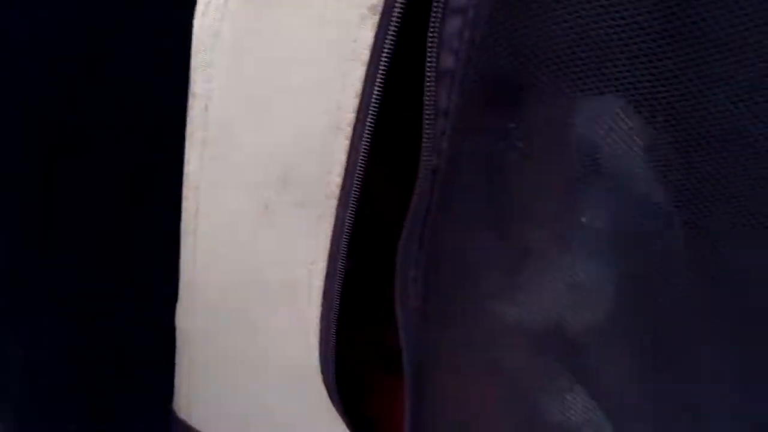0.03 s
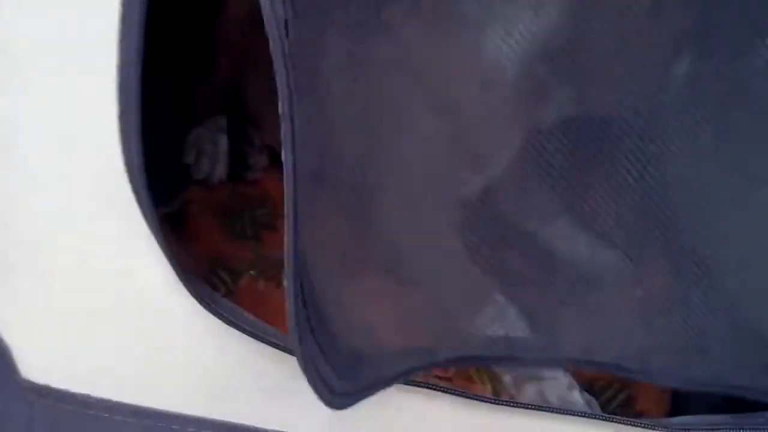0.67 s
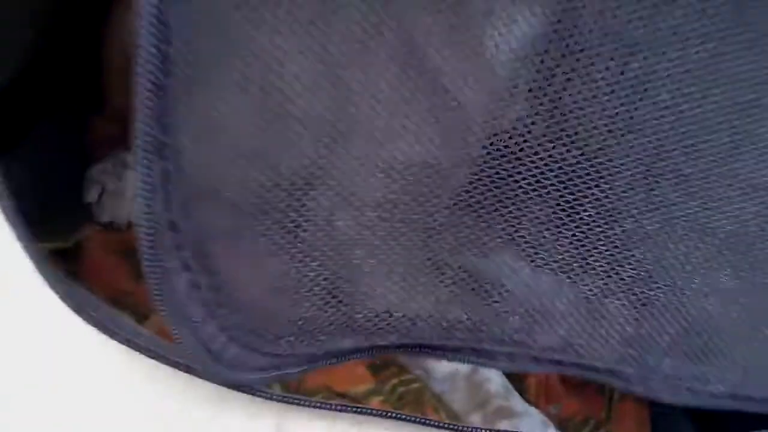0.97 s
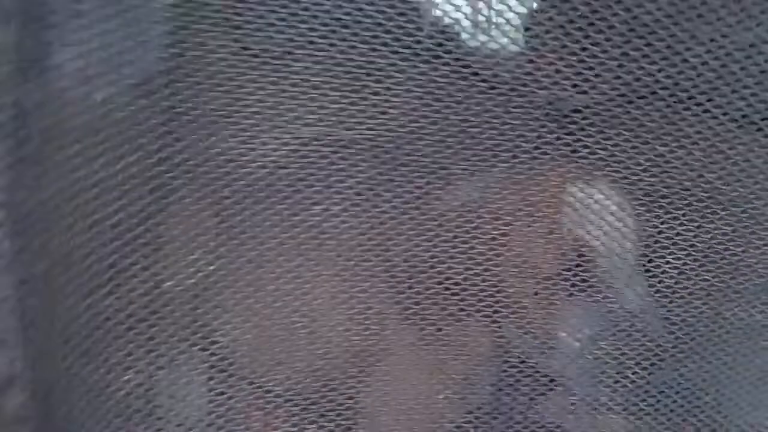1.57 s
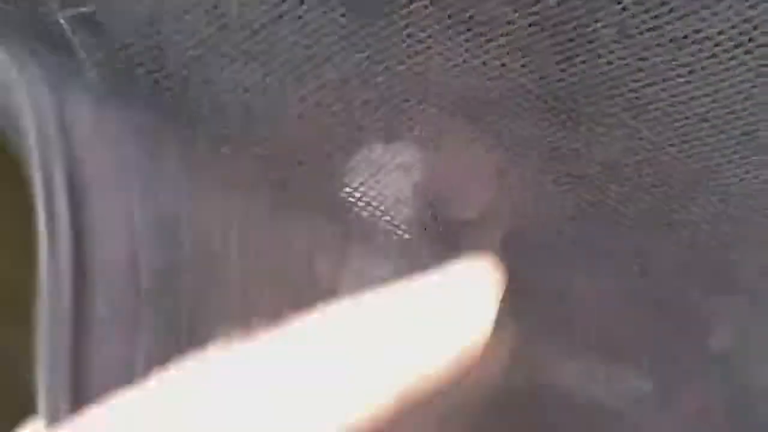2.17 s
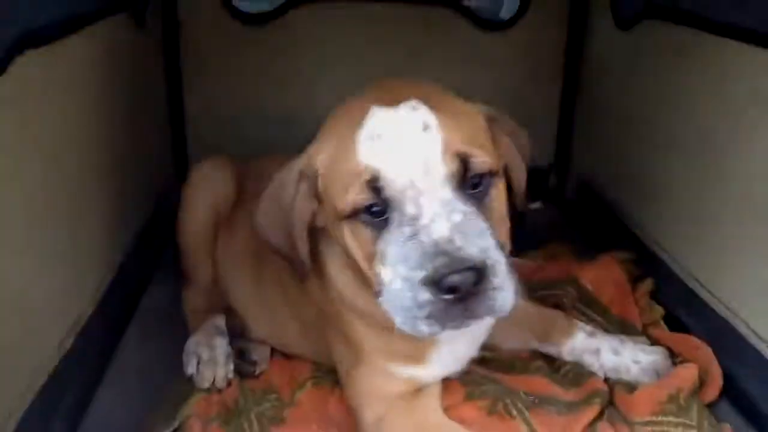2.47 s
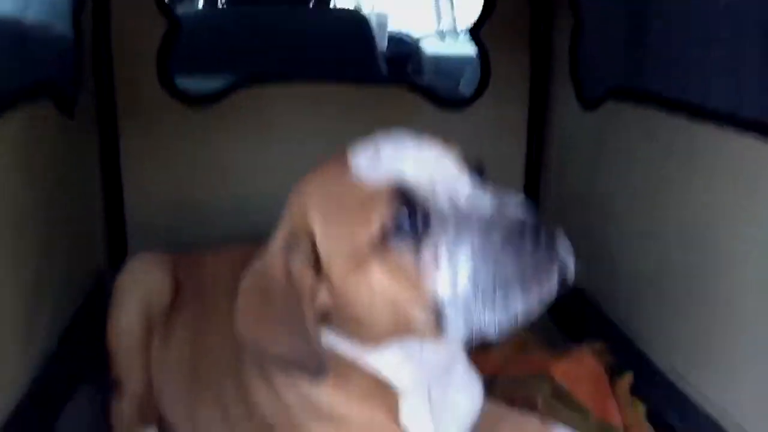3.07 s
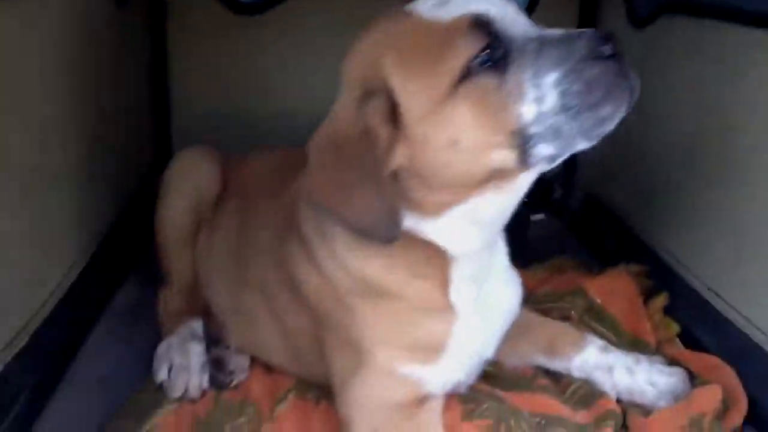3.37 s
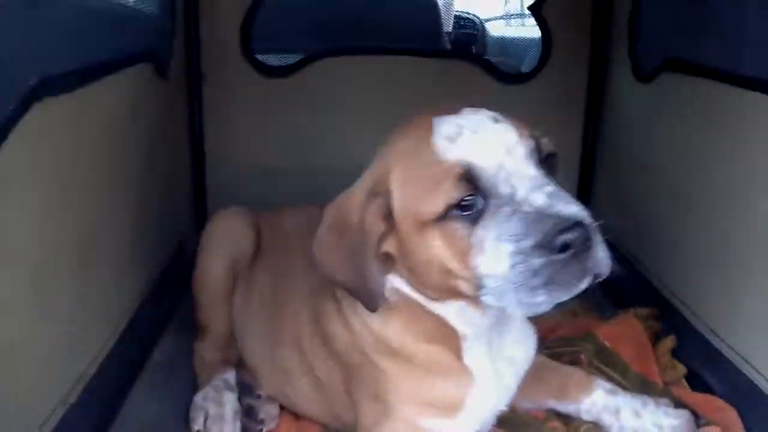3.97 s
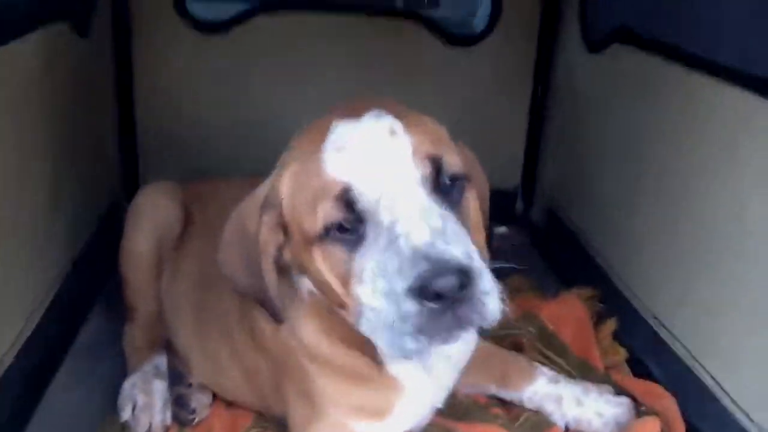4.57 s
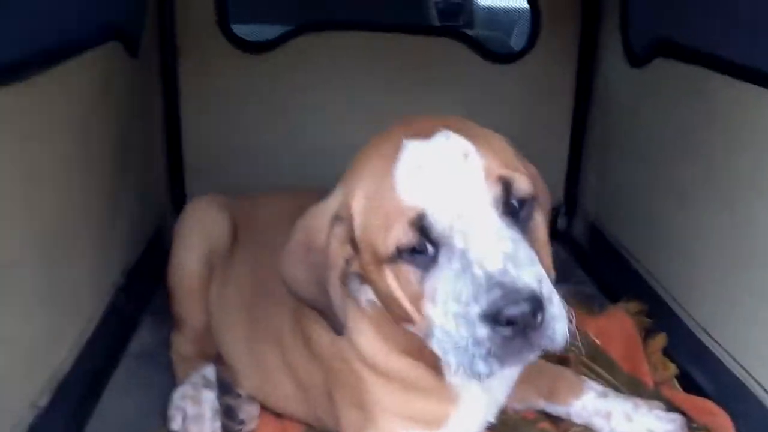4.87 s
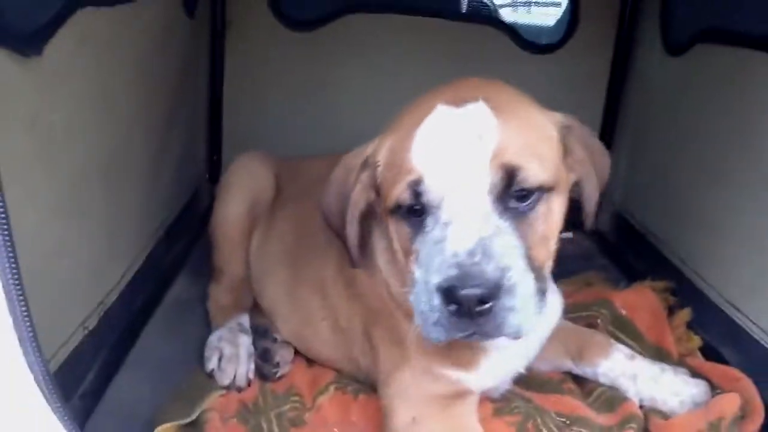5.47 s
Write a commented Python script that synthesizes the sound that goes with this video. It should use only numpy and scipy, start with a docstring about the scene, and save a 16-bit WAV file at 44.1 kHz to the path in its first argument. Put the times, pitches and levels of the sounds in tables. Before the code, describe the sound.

Inside a moving car, short zipper tugs and fabric rustles give way to soft thuds, a small metal tinkle and a sharp clack.

```python
"""Inside a moving car, over steady road noise, the mesh door of a soft pet crate is unzipped up close.
The zip rasps in short tugs, nylon swishes and ticks, and a thin tyre whine creeps in behind them.
The loose door lifts away with a dull flap; then the engine hum swells and soft thuds jolt the cabin.
The metal zip pull tinkles, and at 4.4 s something hard lands with one sharp clack. Automatic gain
control ducks the whole mix and creeps back while the engine sags under a few last swishes."""
import sys
import numpy as np
from scipy import signal
from scipy.fft import rfft, irfft
from scipy.io import wavfile
from scipy.ndimage import uniform_filter1d

SR = 44100
rng = np.random.default_rng(int(sys.argv[2]) if len(sys.argv) > 2 else 0)


def master_out(mix):
    """Clip the mix to full scale and print it as 16-bit PCM to the path in sys.argv[1]."""
    frames = np.transpose(np.atleast_2d(mix))
    ceiling = np.clip(frames, -1, 1)
    pcm = np.round(ceiling * 32767).astype(np.int16)
    wavfile.write(sys.argv[1], SR, pcm)


N = 252693
TIME, HZ = np.arange(N) / SR, np.fft.rfftfreq(N, 1 / SR)

# Tone of the road bed. Each row: frequency in Hz, relative level in dB.
ROAD_EQ = [(30, -76), (50, -23.5), (75, -14.5), (140, -2.5), (220, 2.5), (330, -4.5), (550, -12),
           (950, -14), (1400, -15.5), (2000, -20), (3000, -26.5), (4000, -31.0), (8000, -43.5),
           (15500, -57)]
# Peaks and dips in the cabin drone: low engine hum, cabin and tyre resonances.
# Each row: centre in Hz, width in Hz, boost or cut in dB.
CABIN_DRONE_EQ = [(95.6, 11.4, 4), (130, 8.2, -6.5), (143, 6, 2), (202, 42, 2), (232.4, 4.6, 7),
                  (318, 50, -0.5), (263, 15.4, 5.5), (370.6, 31, 7.5), (418.4, 23.3, 6), (519, 49, 2.5),
                  (612, 35, 6.5), (681, 62, 4.5), (771, 23, 8), (1023, 110, 2.5), (1178, 79, 5),
                  (1381, 96, 5.5)]
# Tone of the microphone hiss. Each row: frequency in Hz, relative level in dB.
HISS_EQ = [(300, 11.5), (2500, 3.5), (5000, 6.0), (9000, 2.0), (15000, 0)]
# The engine's pitch curve. Each row: time in seconds, firing rate in Hz.
FIRING_CURVE = [(1.2, 99.6), (3.3, 90.74), (4.55, 97.5), (5.15, 82.4), (5.73, 82.7)]
# Harmonics of the hum. Each row: multiple of the firing rate, relative level in dB.
ENGINE_HARMONICS = [(1, -1), (2, 0), (3, -2)]
# Tugs on the zip. Each row: start in seconds, length in seconds, level in dB, treble tilt in dB.
ZIP_TUGS = [(0, .02, -27.5, .5), (.06, .015, -48.5, 4), (.132, .09, -41.5, 5.5), (.2, .063, -38.5, 4.5),
            (.394, .025, -49, 7), (.486, .033, -41, 1), (.768, .015, -47, -2)]
# Tone of the zip's rasp. Each row: frequency in Hz, relative level in dB.
ZIP_EQ = [(100, -39), (300, -4), (700, 1.5), (1400, -0.5), (2000, -4), (3000, -2), (5500, -6),
          (7000, -10.5), (9000, -12.5), (12000, -16), (15000, -23)]
# The taut door panel under the zip. Each row: centre in Hz, width in Hz, boost or cut in dB.
PANEL_RESONANCES = [(570, 57, -1), (820, 210, 7), (1410, 250, 5.5), (1600, 70, 6.5), (1810, 220, 3.5),
                    (2184, 61, 10.5), (2820, 120, 1.5), (4220, 290, 2.5)]
# Fabric sliding on fabric. Each row: peak time in seconds, level in dB, length in seconds.
FABRIC_STROKES = [(0.304, -51.5, 0.039), (0.394, -51.5, .06), (.565, -54, .025), (.725, -56, 0.15),
                  (1.253, -76, .04), (1.33, -67, 0.11), (1.555, -56.5, 0.058), (1.688, -50.5, 0.039),
                  (2.397, -39.5, .014), (2.402, -53.5, 0.068), (2.68, -62.5, 0.27), (3.522, -48.5, 0.035),
                  (3.757, -53.5, 0.064), (3.878, -59, 0.23), (4.372, -54, 0.054), (5.091, -51, 0.032),
                  (5.182, -53.5, .06), (5.28, -55.5, .038)]
# Tone of the nylon. Each row: frequency in Hz, relative level in dB.
FABRIC_EQ = [(700, -30), (2000, -7), (4000, -2), (7500, 3), (11000, 2.5), (15000, 1.5)]
# Zip teeth and seams snapping. Each row: start in seconds, level in dB, centre in Hz,
# roll-off one octave from the centre in dB (held to at least 1.5 when played).
SEAM_SNAPS = [(.2608, -29, 4200, 2), (.7738, -28, 4500, 2.5), (.859, -21.5, 3870, 7),
              (.9955, -26, 6000, 1.5), (1.2552, -26, 5500, -1), (1.2642, -25, 5430, 0),
              (2.3835, -20, 5600, 1.5)]
# Soft jolts in the cabin. Each row: peak time in seconds, level in dB, pitch in Hz.
CABIN_JOLTS = [(3.385, -35, 210), (3.552, -28, 205), (3.96, -34, 184)]
# Taps of the zip pull. Each row: start in seconds, ring level in dB, scratch level in dB.
PULL_TAPS = [(3.905, -53, -46), (3.9667, -27.5, -38), (4.071, -41, -41)]
# The metal pull's ring. Each row: frequency in Hz, relative level in dB, 60 dB decay in seconds.
PULL_MODES = [(4840, -5.5, 0.025), (8360, -21, .04), (11100, -8.5, 0.061), (11470, -14, .05)]
# The clack, its rattle and one bounce. Each row: start in seconds, gains of crack, body and spray
# in dB, contact hardness as a cutoff in Hz.
CLACK_HITS = [(4.4089, -3.5, -10.5, -24, 3030), (4.4127, -9, -16.5, -34, 3890),
              (4.4221, -36, -6.5, -52, 370), (4.43, -17, -11.5, -41, 593), (4.4351, -23, -19.5, -49, 430),
              (4.5142, -18, -29, -45, 3300)]
# Tone of the crack. Each row: frequency in Hz, relative level in dB.
CRACK_EQ = [(200, -17), (700, -18), (1500, -10), (3300, 0), (5000, -6), (7500, -7.5), (10500, -4),
            (13000, -7), (15500, -25)]
# The struck frame's ring. Each row: frequency in Hz, relative level in dB, 60 dB decay in seconds.
FRAME_MODES = [(171, -1, 0.064), (198.8, -3.5, 0.21), (281, -1.5, 0.055), (277.6, 4, 0.038),
               (437.6, -3.5, 0.05), (457, -5, 0.069), (582, -2.5, 0.027), (631, -6, 0.055),
               (650, -8, 0.056), (746, -5.5, 0.022), (856, 2.5, 0.021), (1174, -4.5, 0.045),
               (1225, -2.5, 0.028), (1318, -2, 0.022), (1635, -13.5, 0.039), (1750, -13, 0.052),
               (2240, -1.5, 0.028), (2292, -8, 0.041), (2716, -7, 0.028), (2820, -11, 0.039),
               (3010, -10, 0.025), (3240, -3.5, 0.016), (3600, -13, 0.032), (4093, -8, 0.041),
               (5450, -25, .03), (6770, -0.5, 0.027), (7300, -6, 0.023)]
# Tone of the spray of cabin reflections. Each row: frequency in Hz, relative level in dB.
SPRAY_EQ = [(100, -9), (450, 1), (1200, -4), (2200, -6), (3500, -6), (5000, -9.5), (7500, -7), (9000, -8),
            (11000, -10), (15000, -16)]
# Tail of that spray. Each row: frequency in Hz, 60 dB decay in seconds.
SPRAY_DECAY = [(200, 0.32), (1000, 0.15), (3000, 0.13), (12000, 0.11)]


def gain_of(db):
    return 10 ** (np.asarray(db) / 20)


def unit_rms(x):
    return x / np.sqrt(np.mean(x ** 2) + 1e-20)


def curve(points, hz=HZ):
    """A table's value at any frequency, joined up on a log axis."""
    point_hz, value = np.transpose(points)
    return np.interp(np.log(hz + 1), np.log(point_hz + 1), value)


def bells(bands):
    """Bell-shaped boosts and cuts in dB."""
    return sum(db * np.exp(-2 * ((HZ - hz) / width) ** 2) for hz, width, db in bands)


def equalise(x, db):
    return irfft(rfft(x) * gain_of(db), N)


def lowpass(x, hz, steepness=2):
    return irfft(rfft(x) / (1 + (HZ / hz) ** steepness), N)


def band_rms(x, lo_hz, hi_hz):
    return np.std(irfft(rfft(x) * ((HZ > lo_hz) & (HZ < hi_hz)), N))


def wander(rate_hz):
    """Smooth random modulation at unit RMS."""
    return unit_rms(irfft(rfft(rng.standard_normal(N)) * np.exp(-(HZ / rate_hz) ** 2), N))


def ramp(start_s, length_s):
    return np.clip((TIME - start_s) / length_s, 0, 1)


def add(mix, start_s, sound):
    part = mix[max(round(start_s * SR), 0):][:len(sound)]
    part += sound[:len(part)]


def snap(eq_db, size=2048):
    """The tightest click with this tone: minimum phase, peak 1."""
    cepstrum = irfft(np.log(gain_of(np.maximum(eq_db, -90))), N)
    cepstrum[1:N // 2] *= 2
    cepstrum[N // 2:] = 0
    click = irfft(np.exp(rfft(cepstrum)), N)[:size]
    return click / abs(click).max()


def crate_echoes(x, wet, t60, size=2048):
    """A sound followed by dense, brief echoes off the crate's walls."""
    walls = wet * rng.standard_normal(size) * gain_of(-60 * TIME[:size] / t60)
    walls[0] = 1
    return signal.fftconvolve(x, walls)


def road(boom_db=-40, roar_db=-48, split_hz=550, surface_db=0.5, lump_db=1.1, grit_db=1):
    """Tyres shake the cabin: a lumpy boom below, a gritty roar above, both swaying with the surface."""
    sway = gain_of(surface_db * wander(3.4))
    noise = equalise(rng.standard_normal(N), curve(ROAD_EQ) + bells(CABIN_DRONE_EQ))
    low = lowpass(noise, split_hz, steepness=8)
    high = lowpass(noise - low, hz=6500)
    boom = low / band_rms(low, 100, 500) * gain_of(boom_db + lump_db * wander(38))
    roar = high / band_rms(high, 600, 3000) * gain_of(roar_db + grit_db * wander(34))
    return sway * (boom + roar)


def hiss(level_db=-60):
    """An even floor of microphone hiss."""
    return gain_of(level_db) * unit_rms(equalise(rng.standard_normal(N), curve(HISS_EQ)))


def engine(coast_db=-69, load_db=-49.5, boom_hz=86, boom_width_hz=4.7, boom_db=4.4,
           waver=0.009, throb_db=1.0):
    """The firing hum coasts faintly, swells and climbs under load, then sags into a cabin resonance."""
    firing_hz = np.interp(TIME, *np.transpose(FIRING_CURVE))
    resonance_db = boom_db * np.exp(-2 * ((firing_hz - boom_hz) / boom_width_hz) ** 2)
    level_db = coast_db + (load_db - coast_db) * ramp(start_s=3.25, length_s=0.18) + resonance_db
    phase = 2 * np.pi * np.cumsum(firing_hz * (1 + waver * wander(12.3))) / SR
    return np.sqrt(2) * sum(gain_of(level_db + db + throb_db * wander(6.3)) * np.sin(multiple * phase)
                            for multiple, db in ENGINE_HARMONICS)


def slider(creep_db=-52.5, creep_tilt_db=-10.5, fade_db_per_s=7.5, release_s=0.007,
           ref_teeth_per_s=480, ref_db=-40, db_per_doubling=11.5):
    """Short tugs ride on a dull, slowing creep; gives teeth per second and the dull and bright gains."""
    moves = [(gain_of(creep_db - fade_db_per_s * TIME), creep_tilt_db)]
    for start, length, db, tilt_db in ZIP_TUGS:
        release = np.exp(-np.maximum(TIME - start - length, 0) / release_s)
        moves.append((gain_of(db) * ramp(start, length / 2) * release, tilt_db))
    dull, level, bright = [np.sqrt(sum((move * gain_of(sign * tilt)) ** 2 for move, tilt in moves))
                           for sign in (-1, 0, 1)]
    doublings = (20 * np.log10(level) - ref_db) / db_per_doubling  # louder means faster
    return ref_teeth_per_s * 2 ** doublings, dull, bright


def zipper(jitter=0.42, tooth_spread_db=4, tape_rub=0.65, catch_db=-1.0, slowest_per_s=60):
    """Teeth part at an uneven rate and the tape rubs and catches; both sound through the door panel."""
    rate, dull_gain, bright_gain = slider()
    rate = np.maximum(rate, slowest_per_s)
    teeth_passed = np.floor(np.cumsum(rate * np.exp(jitter * wander(300))) / SR)
    flicks = np.diff(teeth_passed, prepend=0) * rng.choice([-1, 1], N)  # a tooth flicks either way
    teeth = flicks * gain_of(tooth_spread_db * rng.standard_normal(N)) / np.sqrt(rate)
    teeth = unit_rms(crate_echoes(teeth, wet=0.22, t60=0.02)[:N])
    tape = tape_rub * rng.standard_normal(N) * gain_of(catch_db * wander(180))
    rasp = unit_rms(equalise(teeth + tape, curve(ZIP_EQ) + bells(PANEL_RESONANCES)))
    dull = lowpass(rasp, hz=2500)
    return dull_gain * dull + bright_gain * (rasp - dull)


def fabric(rise_share=0.44, rustle_db=-68, sway_db=5, rustle_until_s=2.45, weave_db=2):
    """Nylon slides in short strokes over a faint handling rustle; the weave adds a fine grain."""
    stroke_power = np.zeros(N)
    for peak_s, db, length in FABRIC_STROKES:
        width_s = length * np.where(TIME < peak_s, rise_share, 1 - rise_share)
        stroke_power += gain_of(db) ** 2 * np.exp(-((TIME - peak_s) / width_s) ** 2)
    rustle = gain_of(rustle_db + sway_db * wander(3)) * (1 - ramp(rustle_until_s, 0.11))
    rub = rng.standard_normal(N) * gain_of(weave_db * wander(700))
    return np.sqrt(stroke_power + rustle ** 2) * unit_rms(equalise(rub, curve(FABRIC_EQ)))


def ticks(crinkle_count=11, span_s=(0.19, 1.6), range_hz=(3800, 9000), crinkle_db=-39, crinkle_fall_db=11):
    """Teeth and seams snap, each with a broad resonance; faint random crinkles fall as the door folds."""
    out = np.zeros(N)
    crinkles = [(np.interp(when, (0, 1), span_s), crinkle_db,
                 np.interp(pitch, (0, 1), range_hz), crinkle_fall_db)
                for when, pitch in rng.random((crinkle_count, 2))]
    for start, db, hz, fall_db in SEAM_SNAPS + crinkles:
        click = snap(-max(fall_db, 1.5) * np.log2((HZ + 1) / hz) ** 2)
        add(out, start, gain_of(db) * crate_echoes(click, wet=0.08, t60=0.017))
    return out


def tyre_whine(pitch_hz=1216, width_hz=34, level_db=-56, sway_db=2, from_s=0.51, until_s=4.7):
    """The tread sings one narrow, wavering note over one stretch of road."""
    fade_s = 0.4
    envelope = ramp(from_s, fade_s) * (1 - ramp(until_s - fade_s, fade_s))
    phase = 2 * np.pi * pitch_hz * TIME
    note = unit_rms(wander(width_hz) * np.cos(phase) + wander(width_hz) * np.sin(phase))
    return envelope * gain_of(level_db + sway_db * wander(3)) * note


def door_flap(peak_s=2.45, length_s=0.29, level_db=-47, centre_hz=515, fall_db=5, crumple_db=2):
    """The loose door brushes over the crate in one dull, uneven swell."""
    swell = np.exp(-(2 * (TIME - peak_s) / length_s) ** 2)
    brush = rng.standard_normal(N) * gain_of(crumple_db * wander(60))
    eq_db = -fall_db * np.log2((HZ + 1) / centre_hz) ** 2
    return gain_of(level_db) * swell * unit_rms(equalise(brush, eq_db))


def thuds(rise_s=0.0067):
    """Small jolts swell and die in the cabin's low resonance."""
    out, t = np.zeros(N), TIME[:4096]
    envelope = t / rise_s * np.exp(1 - t / rise_s)
    for peak_s, db, hz in CABIN_JOLTS:
        add(out, peak_s - rise_s, gain_of(db) * envelope * np.sin(2 * np.pi * hz * t))
    return out


def zip_pull(rebounds=3, gap_s=0.007, ring_step_db=-14, scratch_step_db=-5.5, scratch_t60=0.02):
    """Each tap is a scratch of contact and a short metallic ring, chattering off in weaker rebounds."""
    out, t = np.zeros(N), TIME[:4096]
    ring = sum(gain_of(db - 60 * t / t60) * np.sin(2 * np.pi * hz * t) for hz, db, t60 in PULL_MODES)
    for start, ring_db, scratch_db in PULL_TAPS:
        for k in range(rebounds + 1):
            envelope = gain_of(scratch_db + k * scratch_step_db - 60 * t / scratch_t60)
            scratch = rng.standard_normal(len(t)) * envelope
            delay_s = k * gap_s * rng.uniform(0.81, 1.2)
            add(out, start + delay_s, gain_of(ring_db + k * ring_step_db) * ring + scratch)
    return out


def cabin_spray(t, build_s=0.0003):
    """Dense reflections build up in the cabin and die away, treble first."""
    noise = unit_rms(equalise(rng.standard_normal(N), curve(SPRAY_EQ)))[:len(t)]
    hz, age, bands = signal.stft(noise, SR, nperseg=256)
    decay = gain_of(-60 * age / curve(SPRAY_DECAY, hz)[:, None])
    tail = signal.istft(bands * decay, SR)[1][:len(t)]
    return tail * (1 - np.exp(-t / build_s))


def clack(crack_reach=2.2, low_cut_hz=100):
    """Something hard lands, rattles and bounces: each hit cracks, rings the frame and sprays echoes."""
    out, t = np.zeros(N), TIME[:16384]
    for start, crack_db, body_db, spray_db, contact_hz in CLACK_HITS:
        # a soft contact dulls the crack and reaches only the low modes
        crack = snap(curve(CRACK_EQ) - 20 * np.log10(1 + (HZ / (crack_reach * contact_hz)) ** 2))
        body = np.zeros(len(t))
        for k, (hz, db, t60) in enumerate(FRAME_MODES):
            drive = (-1) ** k / (1 + (hz / contact_hz) ** 2)
            body += drive * gain_of(db - 60 * t / t60) * np.sin(2 * np.pi * hz * t)
        add(out, start, gain_of(crack_db) * crack)
        add(out, start, gain_of(body_db) * body + gain_of(spray_db) * cabin_spray(t))
    # a small frame radiates little deep bass
    return signal.lfilter(*signal.butter(2, low_cut_hz, "high", fs=SR), out)


def scene():
    """The car bed and the crate foley meet at one close microphone."""
    car = road() + tyre_whine() + engine() + thuds()
    crate = zipper() + fabric() + door_flap() + ticks() + zip_pull() + clack()
    return (car + crate + hiss())[None]


def record(dry, threshold_db=-25, slope=0.32, release_db_per_s=1.0, attack_s=0.021, top_hz=15380):
    """Gain control ducks after a loud sound and creeps back; a steep low-pass trims the top."""
    power_db = 10 * np.log10(abs(uniform_filter1d(dry[0] ** 2, 400)) + 1e-12)
    leak_db = release_db_per_s * TIME
    held_db = np.maximum.accumulate(power_db + leak_db) - leak_db  # a slowly sinking peak hold
    over_db = np.maximum(held_db - threshold_db, 0)
    pole = np.exp(-1 / (attack_s * SR))
    duck_db = slope * signal.lfilter([1 - pole], [1, -pole], over_db)
    high_cut = signal.firwin(511, top_hz, window=("kaiser", 9), fs=SR)
    return signal.oaconvolve(dry / gain_of(duck_db), high_cut[None], "same")


dry = scene()
out = record(dry)
master_out(out)
```